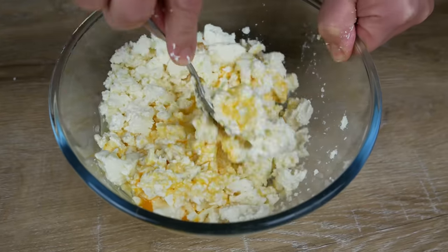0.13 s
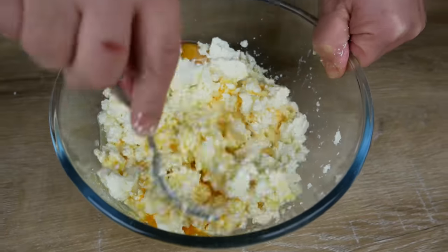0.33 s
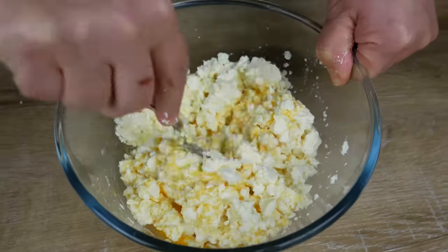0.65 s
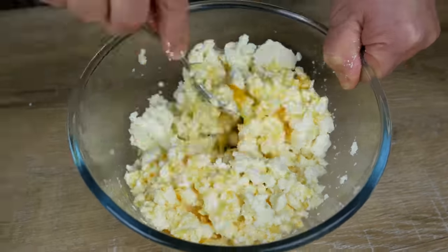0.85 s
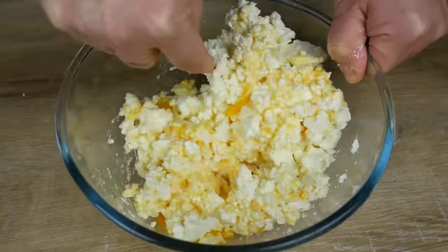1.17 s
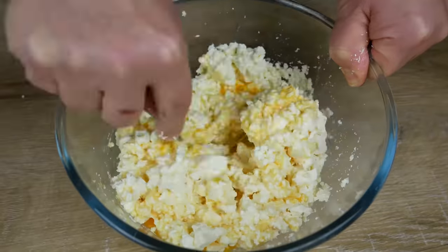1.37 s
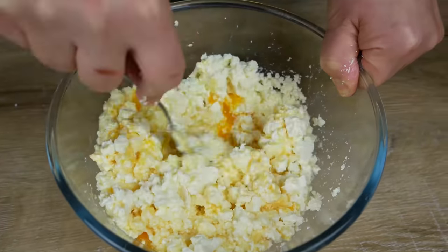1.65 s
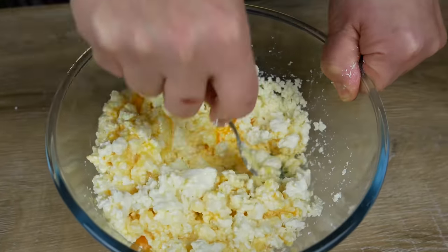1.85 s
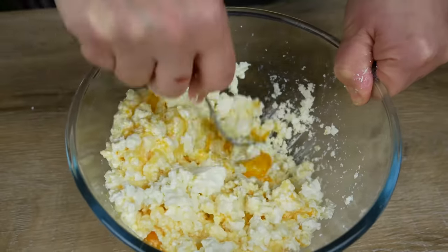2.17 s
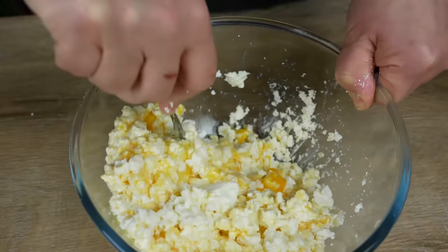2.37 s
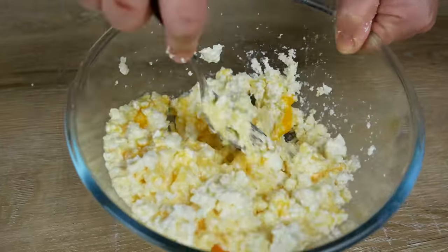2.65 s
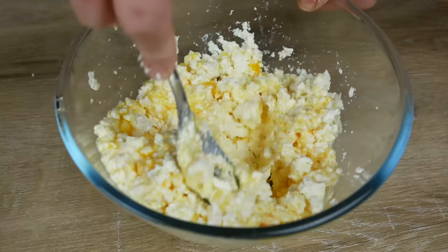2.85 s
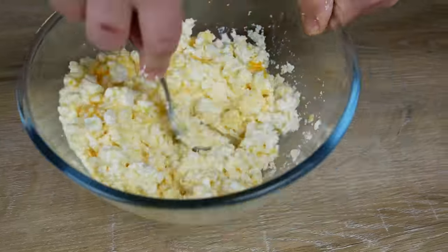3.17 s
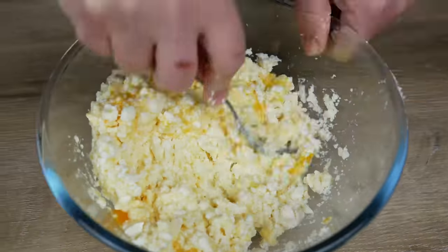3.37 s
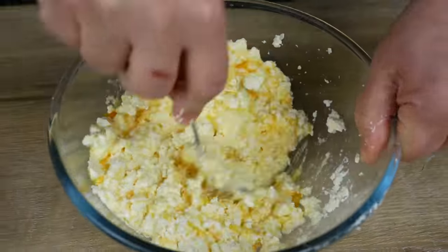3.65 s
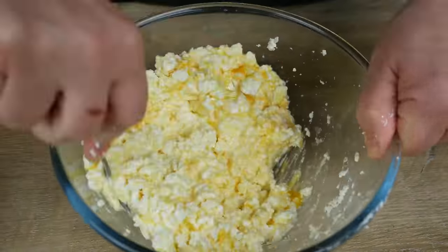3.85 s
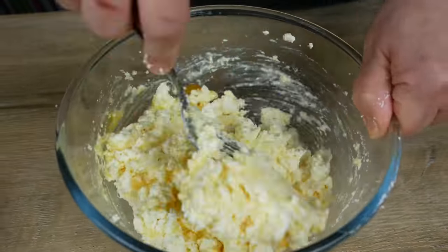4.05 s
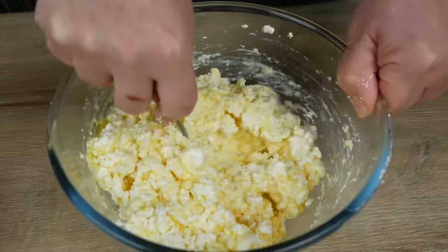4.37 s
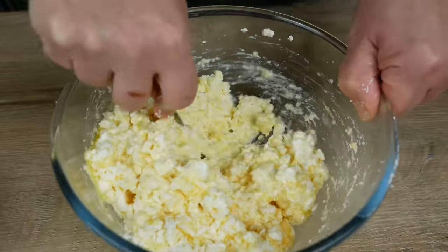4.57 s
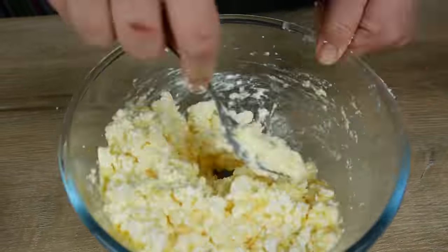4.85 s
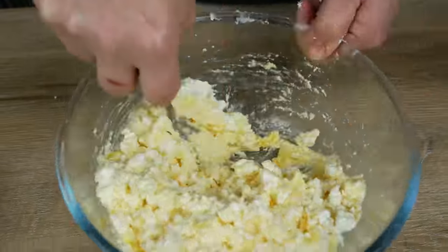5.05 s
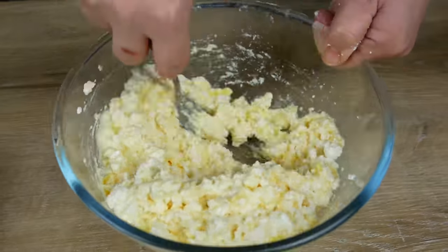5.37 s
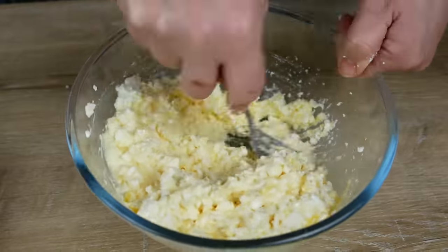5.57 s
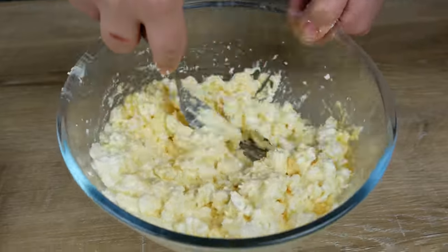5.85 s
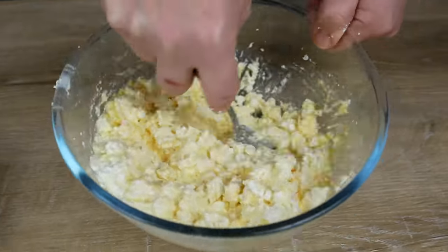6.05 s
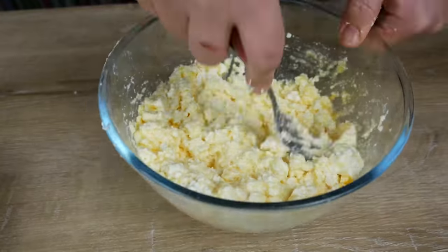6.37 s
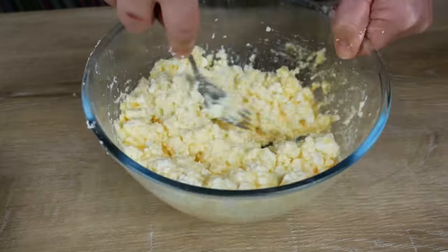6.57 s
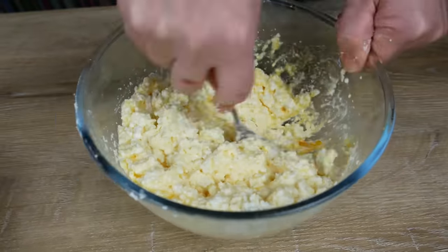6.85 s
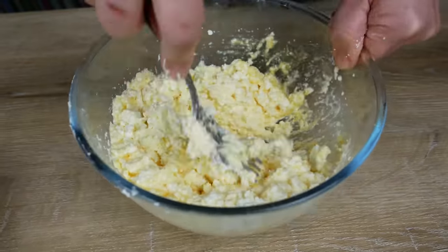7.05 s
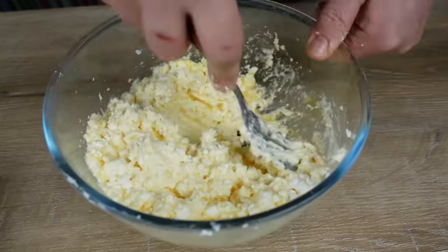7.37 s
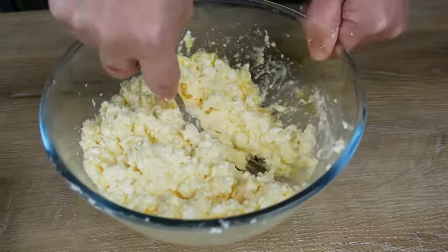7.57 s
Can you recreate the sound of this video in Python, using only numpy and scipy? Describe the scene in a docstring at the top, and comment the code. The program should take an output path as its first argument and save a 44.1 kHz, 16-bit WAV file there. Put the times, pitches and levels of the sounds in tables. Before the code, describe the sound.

A metal fork rapidly beats wet crumbled cheese and egg in a glass bowl, clicking and squelching as the bowl knocks on wood.

```python
"""Fork beating cheese and egg

A metal fork beats crumbled cheese and egg in a glass bowl, about twelve strokes a second. Each stroke
is a short chatter of tines on glass, a wet drag through the mix and a knock of the bowl on a wooden
board, all made of gritty contact noise played through resonances. Sticky crackle, a few rim clinks,
low kitchen rumble and room tone fill the gaps. The image starts centred, then opens wide."""
import sys
import numpy as np
from scipy import signal
from scipy.fft import rfft, irfft, next_fast_len
from scipy.io import wavfile

SR = 44100
rng = np.random.default_rng(int(sys.argv[2]) if len(sys.argv) > 2 else 0)


def wav_record(signal):
    """Record a signal, one row per channel, as 16-bit PCM in the file named by sys.argv[1]."""
    frames = np.transpose(np.atleast_2d(signal))
    bounded = np.clip(frames, -1, 1)
    # unit amplitude maps onto the largest positive 16-bit level
    quanta = np.round(bounded * 32767).astype(np.int16)
    wavfile.write(sys.argv[1], SR, quanta)


N = 340011

# Bowl and fork, damped by the mix. Each row: pitch in Hz, bandwidth in Hz, level in dB.
BOWL_MODES = [(663, 250, -5), (770, 144, 0.5), (1072, 97, -8), (1277, 110, -5), (1476, 470, -3),
              (2024, 56, -5), (2490, 510, -5.5), (2875, 415, -2), (3310, 540, -8.5), (3494, 740, -8.5),
              (3754, 240, -5), (4185, 147, -2), (4530, 210, -1), (4380, 360, -6), (5030, 450, -3.5),
              (6080, 500, -4), (6630, 4500, -16), (7960, 880, 2.5), (8680, 350, 2.5), (9080, 320, 1),
              (9620, 310, 0.5), (11140, 4200, -23), (12300, 390, 4), (12300, 1350, -5), (13770, 3900, -1),
              (15600, 810, -27)]
# The board under the bowl. Each row: pitch in Hz, bandwidth in Hz, level in dB.
BOARD_MODES = [(87, 82, -20), (140.4, 26.5, 4), (185, 120, -5), (266, 100, -2.5), (314, 81, 1.5),
               (389.5, 49, 1.5), (594, 157, -4.5)]
# The stereo image. Each row: time in seconds, width from 0 (centred) to 1.
STEREO_WIDTH = [(0, 0), (.36, 0.1), (.39, 0.68), (.7, 1), (7.71, 0.94)]
# Colour of the room tone. Each row: frequency in Hz, relative level in dB.
ROOM_SPECTRUM = [(20, -20), (45, -36), (110, -26.5), (340, -28), (700, -38), (3300, -39.5), (7000, -43),
                 (11000, -57), (16000, -59)]
# Fade of a faint tone in the room. Each row: time in seconds, rms level in dB.
TONE_FADE = [(0, -60), (1.5, -61), (2.2, -86), (3.0, -88)]
# Low kitchen rumble. Each row: time in seconds, rms level in dB.
RUMBLE_LEVEL = [(0,-49),(.79,-63),(1.1,-72),(1.719,-75),(2.98,-65),(3.6,-58),(4,-71),(4.87,-69),(6.1,-73),(6.72,-60),(7.71,-59)]
# Crackle of the mix. Each row: time in seconds, rms level in dB.
CRACKLE_LEVEL = [(0,-50),(.3,-53),(.6,-51.5),(1.4,-43.5),(2.2,-55),(3,-46),(3.7,-55.5),(4.1,-58),(4.4,-61),(5.2,-47.5),(6,-51.5),(6.8,-64),(7.2,-42.5),(7.71,-71)]
# The beating. Each row: start in seconds, contact in ms, chatter level in dB, featured ring in Hz,
# bass and treble in dB against the chatter, drag length in ms, drag level in dB, board knock in dB.
FORK_STROKES = [(.091,11.5,-24.5,2270,-6,-18,79,-36.5,-26.5),(.379,20.4,-25,2200,-3,-6,57,-47,-33.5),(0.623,17,-42,815,4,-8,56,-48,-40),(0.706,43,-43.5,6060,-0.5,-1,86.4,-50.5,-62),
                (0.809,14,-30.5,5660,0.5,3,85.32,-51.5,-36.5),(0.913,27,-28.5,4760,0,-2,54.5,-43.5,-25.5),(1.014,37,-37.5,1390,-4,-6,93.96,-47.5,-59),(1.114,14.5,-27.5,910,3,-8,49.6,-38.5,-25.5),
                (1.216,8.4,-43,2130,-19,2,96,-46,-62),(1.351,37,-39.5,1180,0,-17,106,-49.5,-60),(1.458,21,-32.5,2400,2,-8,54.7,-37.5,-37),(1.552,11.5,-27,804,-0.5,-6,47,-37,-30),
                (1.625,18,-42.5,5790,-5,5.5,75.6,-45.5,-54),(1.711,15,-20,2570,-14,-1,57,-40,-27.5),(1.8,12,-25,860,-1.5,-2.5,54,-40,-26.5),(1.884,12,-23,2650,-9.5,-4,47.4,-42.5,-28),
                (1.966,10,-28.5,4480,-15,-1,48.4,-43.5,-30),(2.041,10.3,-30,824,14.5,6,55,-46,-36),(2.119,22,-28.5,774,5,4,68.04,-62,-37),(2.205,15,-23.5,4450,-8,-0.5,31,-48,-32),
                (2.283,13.5,-22.5,2750,-4.5,0,51,-43.5,-36),(2.36,16.4,-27,2560,-13,0,31.48,-43,-35.5),(2.437,15,-26.5,5100,-1,1,118,-48,-34.5),(2.605,37.5,-26.5,2670,-2,-1.5,97.2,-54,-25),
                (2.71,26,-27,3350,-3,-3.5,48,-37,-28.5),(2.808,36,-26.5,4120,-5,-6,62.04,-43,-33),(2.892,62,-36,820,-1,-1,72.36,-49.5,-55),(2.984,21,-29,4200,-7.5,-1,57,-39,-37),
                (3.064,10.4,-18.5,4450,-3.5,-3,73,-40.5,-37),(3.157,13,-27.5,2120,3,2,62,-42,-30.5),(3.234,14.6,-27.5,714,3,-2,38,-38.5,-39),(3.308,12.4,-23,2190,-5,4.5,55.6,-38.5,-40),
                (3.389,8.2,-23.5,1310,4,-1.5,47,-38,-42),(3.483,16,-30.5,2640,-20,-2.5,55.5,-40,-34.5),(3.555,10,-20.5,2070,-1,-3,54.6,-37,-47),(3.635,8.3,-23.5,1330,0.5,5.5,57.5,-38.5,-41.5),
                (3.712,11.2,-18.5,6070,-9,-1.5,55,-37.5,-36),(3.789,7.1,-18.5,673,4,-4.5,43.6,-38,-32),(3.872,9.2,-29,2770,-17,10,40,-49,-38.5),(3.914,11,-22.5,4400,-35,-5.5,32.4,-43,-43),
                (4.202,16,-29,1410,-4.5,0,54,-42.5,-26),(4.377,16,-28,1640,-5,1.5,46.44,-41.5,-26),(4.461,15,-22.5,4800,-2.5,-1.5,44,-44,-34),(4.534,24,-36.5,2980,1.5,0.5,60,-49,-43),
                (4.598,10.6,-21.5,810,1,-11,26.85,-32.5,-34),(4.662,10.6,-23,1290,5.5,-1,50,-38,-38.5),(4.731,15,-30,1126,10.5,3,39,-38.5,-36.5),(4.813,14,-26,2720,-4,3,48.6,-39,-28.5),
                (4.887,10.4,-25,4200,-9,1,70,-38.5,-26.5),(4.994,16,-23,4350,-3.5,0,60,-38,-27),(5.07,16.5,-23,4760,-7,1,31,-40,-29.5),(5.142,7.1,-24.5,3930,-5.5,4.5,38,-37,-32),
                (5.205,8.4,-20,4260,-19,4,53,-40,-30),(5.277,10,-22,3550,-6,0,56,-33.5,-27),(5.367,22,-27.5,3900,-14,-1,52.3,-35.5,-29),(5.454,20,-29.5,4200,-11.5,-1.5,47,-36,-34),
                (5.528,16.5,-22.5,4740,-8.5,-8,49,-52,-27.5),(5.593,8.9,-21,880,5,4.5,49,-38.5,-35),(5.671,9,-26,1530,1,1.5,54,-38.5,-35),(5.76,20,-23.5,4750,-14,-2.5,47.52,-39,-26),
                (5.846,16,-23,730,-11,-3.5,42.4,-37.5,-32.5),(5.921,13.6,-21.5,4900,-4,-3.5,53,-42,-26.5),(5.998,11,-25.5,2780,-10,-3,36.5,-41.5,-37),(6.073,11,-26,4700,4.5,4.5,49.6,-37.5,-30.5),
                (6.156,24,-24.5,2860,-12,-7,57.24,-40.5,-28),(6.242,10,-24,5130,-12,2,30,-41,-25.5),(6.323,11,-27,4360,-17,7.5,62.96,-46,-25),(6.405,42,-34.5,3570,-17,-1,69.12,-47.5,-40),
                (6.49,12,-22,5100,-29,0,55.4,-52,-30.5),(6.567,15,-29,3020,-10,9,50,-43,-33),(6.639,13.7,-21.5,3200,-38,3,55,-44,-27.5),(6.709,10.7,-14.5,4600,-14.5,-6.5,60,-39,-35),
                (6.803,12,-23.5,5000,-36,-2.5,29.63,-44,-27.5),(6.882,19,-31.5,4270,-4,2,58,-50,-31),(6.948,11.6,-18,1680,-8.5,-7,62,-40.5,-33.5),(7.024,9,-24,676,6.5,5,38,-39.5,-29),
                (7.097,10,-24.5,4650,0,4.5,50,-41.5,-29),(7.184,16.5,-25.5,4340,-14,-2.5,52.5,-42.5,-33),(7.263,12,-29,4230,-21,0,45,-38.5,-33.5),(7.334,10.4,-27,1210,10,6.5,43.7,-40,-33),
                (7.409,13,-20,4540,-3.5,-2.5,39.96,-43,-33),(7.489,11,-18,4330,-9.5,-4,56.5,-36.5,-42),(7.568,13,-26,1660,-6.5,3,54.6,-38.5,-39),(7.642,8.4,-16,2590,-5.5,-6.5,60.4,-39.5,-34.5)]
# Extra wet squelches, short and long, some leading into a stroke. Each row: start in seconds,
# length in ms, level in dB.
EXTRA_SQUELCHES = [(.006,63,-49.5),(.064,21,-36),(0.174,80,-49.5),(.348,25,-57),(.447,150,-48.5),(1.695,13,-42),(3.939,304,-42),(4.275,69,-39)]
# Colour of the drag. Each row: time in seconds, bass and treble in dB against the drag level.
DRAG_EQ = [(0,-9,-2),(1.3,-10.5,-6),(2.2,-12,-5),(3.5,-6.5,-2),(4.5,-7,-3),(5.5,-10.5,-1.5),(6.5,-3.5,2),(7.71,-8,-2)]
# Sticky ticks as the fork first enters. Each row: start in seconds, peak in dB, pitch in Hz.
ENTRY_TICKS = [(.01,-17,7470),(.0324,-21,8710),(0.0407,-17.5,8710),(.0654,-21,7860),(0.0764,-4,3540),(.0927,-21,2360),(0.1034,-12,2600),
               (.1226,-29,2750),(0.145,-16,4220),(0.179,-15,7600),(0.187,-27,1720),(.194,-11.5,3830),(0.202,-29,1730),(.2064,-21,4850),(.2124,-27,3400),(0.26,-31,8510),(0.3876,-6.5,3820)]
# The bowl rocks and drops back. Each row: start in seconds, contact in ms, knock in dB, deep note in dB.
BOWL_ROCKS = [(0.076,5.9,-22.5,-24),(0.128,18,-32.5,-37),(0.159,14,-39,-46),(1.234,5.6,-32,-44),(3.504,12,-34.5,-31),(3.731,9.2,-18.5,-20),(4.238,7.4,-16.5,-24.5),
              (4.402,6.7,-18,-26.5),(5.079,14,-35,-32),(5.299,9.2,-27.5,-23),(5.798,8.6,-33,-29),(5.961,11,-15.5,-16.5),(6.101,10,-16.5,-18),(6.202,15,-16,-17.5),(6.391,5.2,-17.5,-20.5),
              (6.583,6.9,-17.5,-19),(6.751,11.6,-19,-17),(6.771,9.8,-19,-25),(6.893,10.4,-27,-26.5),(7.273,9.2,-25,-29),(7.51,8.4,-14.5,-20)]
# The board's deep note. Each row: time in seconds, level in dB against a stroke's knock.
DEEP_NOTE = [(0,-1),(1,-3.5),(2,-2.5),(3,-1),(3.8,-3),(4.7,-0.5),(5.5,-0.5),(6.2,0),(7,0),(7.71,-10)]
# A faint sub-bass push. Each row: time in seconds, level in dB against the deep note.
SUB_PUSH = [(0,-9),(3.5,-14),(4.3,-15),(5.1,-12),(5.9,-16),(6.7,-14),(7.71,-16)]
# Tines brush the glass between strokes. Each row: start in seconds, contact in ms, chatter level in dB,
# featured ring in Hz.
GLASS_BRUSHES = [(0.115,33,-28.5,2800),(.536,48,-44.5,970),(0.655,13,-49,830),(1.236,38,-39,2200),(1.388,25,-36,5530),(1.668,13,-31,3940),
                 (1.736,23,-39,4540),(1.823,28,-38,4760),(2.072,24,-36.5,5930),(2.145,37,-41,5030),(2.239,16,-36.5,4600),(2.393,17,-41,2930),(2.467,31,-39,830),
                 (3.014,16,-35.5,1160),(3.103,24,-51,4470),(3.194,17,-36,4380),(3.274,22,-34.5,5440),(3.753,10,-46,800),(3.961,45,-33.5,1300),(4.011,65,-30.5,3240),
                 (4.136,11,-39,5800),(4.323,25,-41,1490),(4.417,14.5,-35,1670),(4.489,27,-33.5,3550),(4.567,9.1,-29,2870),(4.631,14,-34,5280),
                 (4.776,18.5,-32,5400),(4.849,17,-29,4760),(5.033,13,-44,5850),(5.102,21,-29,4750),(5.549,20,-26.5,4970),(6.27,18,-35,5900),
                 (6.35,27,-38.5,5070),(6.515,23,-37,5760),(6.827,20,-41,5800),(6.984,19,-32.5,5460),(7.045,13,-31,4600),(7.066,12.5,-31.5,3830),
                 (7.21,12,-35.5,4800),(7.373,11,-34.5,5900),(7.442,23,-36,5860)]
# The chatter's body thins as curds turn to paste. Each row: time in seconds, base level in dB against
# the chatter.
CHATTER_BODY = [(0,-1.5),(.8,0),(1.4,-3.5),(2,-5),(2.7,-4.5),(3.5,-6),(4.3,-5.5),(5,-4),(5.8,-7),(6.5,-5.5),(7,-7.5),(7.71,-1)]
# Band edges in Hz for the drag: bass, mids, treble, top.
DRAG_BANDS_HZ = (500, 1200, 6500, 10500, 16000)
# Band edges in Hz for the board: push, deep note, knock.
BOARD_BANDS_HZ = (20, 90, 220, 520)
# Band edges in Hz for the tines: bass, body, chatter, treble, top.
TINE_BANDS_HZ = (500, 1200, 2700, 6500, 10500, 16000)
# Clean hits on the bare rim. Each row: start in seconds, peak in dB.
RIM_CLINKS = [(.379, -45), (3.555, -38), (6.073, -22), (7.643, -21.5)]

PRE_ROLL_MS = 12   # room for the attack ahead of each contact


def from_db(db):
    """Decibels to gain."""
    return 10 ** (np.asarray(db) / 20)


def curve_at(s, curve):
    """Read an automation curve at a time in seconds."""
    return np.interp(s, *np.transpose(curve))


def width_at(s):
    """Stereo width at a time in seconds."""
    return curve_at(s, STEREO_WIDTH)


def grit(uneven_db, lump_db, lump_ms):
    """Shared, left and right trains of micro-contacts; the force wavers as curds catch and let go."""
    size = N + SR
    noise = rng.standard_normal((3, size))
    trains = noise * from_db(uneven_db * np.minimum(rng.exponential(1, (3, size)), 6))
    waver = np.interp(np.arange(size) * 1000 / SR / lump_ms, np.arange(9000), rng.standard_normal(9000))
    return trains / trains.std() * from_db(lump_db * waver)


def contact_envelope(ms, rise_ms, fall_ms, sag_db, tail_ms):
    """A rounded attack, a hold that sags and an exponential release, with room left for the ring."""
    size = next_fast_len(int((PRE_ROLL_MS + ms + tail_ms) * SR / 2000)) * 2
    t_ms = np.arange(size) * 1000 / SR - PRE_ROLL_MS
    rise = np.exp(-.5 * (np.minimum(t_ms - rise_ms, 0) / rise_ms) ** 2)
    hold = from_db(-sag_db * np.clip(t_ms / ms, 0, 1))
    return rise * hold * np.exp(-np.maximum(t_ms - ms, 0) / fall_ms)


def resonator(modes, width, size, spread_db, low_hz, high_hz):
    """Stereo response of an object: each mode gets a fresh strength; width pulls its phases apart."""
    hz = np.arange(size // 2 + 1) * SR / size
    centre, bandwidth, level = np.transpose(modes)[:, :, None]
    strength = from_db(level + spread_db * rng.standard_normal((len(modes), 1)))
    left, turn = rng.random((2, len(modes)))
    phase = np.exp(2j * np.pi * np.array([left, left + width * (turn - .5)]))
    low_cut = (1j * hz / (low_hz + 1j * hz)) ** 2   # small bodies radiate no deep bass
    high_cut = 1 / (1 + 1j * hz / high_hz) ** 2
    return low_cut * high_cut * (phase @ (strength / (1 + 2j * (hz - centre) / bandwidth)))


def add_contact(out, s, envelope, trains, response, bands_hz, bands_db, apart):
    """Mix in a burst of resonating grit, levelled by band; `apart` is the unshared part at full width."""
    start = round((s - PRE_ROLL_MS / 1000) * SR)
    skip = max(-start, 0)
    size = len(envelope)
    common, *own = trains[:, start + skip:start + skip + size]
    own_share = apart * width_at(s)
    force = np.sqrt(1 - own_share) * common + np.sqrt(own_share) * np.array(own)
    spectrum = rfft(envelope * force) * response
    hz = np.arange(spectrum.shape[1]) * SR / size
    power = np.mean(abs(spectrum) ** 2, axis=0) / np.sum(envelope ** 2)
    eq_hz, eq_db = [], []
    for low, high, db in zip(bands_hz, bands_hz[1:], bands_db):
        band_power = power[(hz >= low) & (hz < high)].sum() / len(hz)
        eq_hz += [low * 1.1, high / 1.1]
        eq_db += [db - 10 * np.log10(band_power)] * 2
    eq = from_db(np.interp(np.log(hz + 1), np.log(eq_hz), eq_db))
    out[:, start + skip:start + size] += irfft(spectrum * eq, size)[:, skip:N - start]


def room_tone(air_db=-56.5, tone_hz=583):
    """A steady, bass-heavy bed of kitchen air, with a faint tone that fades as the beating speeds up."""
    hz = np.arange(N // 2 + 1) * SR / N + 1
    t = np.arange(N) / SR
    eq_hz, eq_db = np.transpose(ROOM_SPECTRUM)
    colour = from_db(np.interp(np.log(hz), np.log(eq_hz), eq_db))
    mid, side = irfft(rfft(rng.standard_normal((2, N))) * colour, N)
    air = (mid + 1.03 * width_at(t) * side * [[1], [-1]]) / mid.std()
    tone = np.sqrt(2) * from_db(curve_at(t, TONE_FADE)) * np.sin(2 * np.pi * tone_hz * t)
    return from_db(air_db) * air + tone


def kitchen_rumble():
    """Low kitchen rumble, loudest at the start, swelling and fading, mostly in the centre."""
    t = np.arange(N) / SR
    sub_band = signal.butter(2, [15, 55], "band", fs=SR, output="sos")
    mid, side = signal.sosfilt(sub_band, rng.standard_normal((2, N)))
    rumble = (mid + 0.56 * width_at(t) * side * [[1], [-1]]) / mid.std()
    return from_db(curve_at(t, RUMBLE_LEVEL)) * rumble


def sticky_crackle():
    """Films of egg keep parting: fine crackle coloured by the bowl."""
    t = np.arange(N) / SR
    common, *own = grit(uneven_db=4.0, lump_db=7.5, lump_ms=9.0)[:, :N]
    force = np.sqrt(1 - width_at(t)) * common + np.sqrt(width_at(t)) * np.array(own)
    bowl = abs(resonator(BOWL_MODES, width=0, size=2048, spread_db=0.94, low_hz=350, high_hz=21000)[0])
    colour = np.interp(np.linspace(0, 1, N // 2 + 1), np.linspace(0, 1, len(bowl)), bowl)
    crackle = irfft(rfft(force) * colour, N)
    return from_db(curve_at(t, CRACKLE_LEVEL)) * crackle / crackle.std()


def wet_drag(lead_share=0.38, top_drop_db=6.0):
    """Curds and egg squelch past the tines; two wavering layers make the colour wander."""
    out = np.zeros((2, N))
    times, *eq_curves = np.transpose(DRAG_EQ)
    # The fork enters the mix a share of the contact time before it meets glass.
    drags = [(s - lead_share * touch_ms / 1000, ms, db) for s, touch_ms, *_, ms, db, _ in FORK_STROKES]
    for layer in range(2):
        trains = grit(uneven_db=2.0, lump_db=3.0, lump_ms=3.6)
        for s, ms, db in drags + EXTRA_SQUELCHES:
            bass_db, treble_db = [np.interp(s, times, curve) for curve in eq_curves]
            bands_db = db + np.array([bass_db, 0, treble_db, treble_db - top_drop_db])
            envelope = contact_envelope(ms, rise_ms=2.9 + 0.018 * ms, fall_ms=2.3 + 0.021 * ms,
                                        sag_db=4, tail_ms=52)
            bowl = resonator(BOWL_MODES, width_at(s), len(envelope),
                             spread_db=1.5, low_hz=180, high_hz=29000)
            add_contact(out, s, envelope, trains, bowl, DRAG_BANDS_HZ, bands_db, apart=.3)
    return out


def sticky_ticks(snap_s=0.00047, ring_cycles=2.0):
    """The mix ticks as the fork first enters: each a broad snap with a ring of a few cycles."""
    out = np.zeros(N)
    t = np.arange(SR // 100) / SR
    for s, db, hz in ENTRY_TICKS:
        snap = 0.51 * rng.standard_normal(len(t)) * np.exp(-t / snap_s)
        ring = np.sin(2 * np.pi * hz * t) * np.exp(-t * hz / ring_cycles)
        tick = snap + ring
        out[round(s * SR):][:len(t)] += from_db(db) * tick / abs(tick).max()
    return out


def board_knocks(knock_ms=9.9):
    """The bowl bumps the board: a soft contact wakes only the low modes, over a faint push."""
    out = np.zeros((2, N))
    trains = grit(uneven_db=2.5, lump_db=1.0, lump_ms=6.7)
    knocks = [(s, knock_ms, db, db + curve_at(s, DEEP_NOTE)) for s, *_, db in FORK_STROKES]
    for s, ms, db, deep_db in knocks + BOWL_ROCKS:
        push_db = deep_db + curve_at(s, SUB_PUSH)
        envelope = contact_envelope(ms, rise_ms=3.2, fall_ms=8.9, sag_db=5.5, tail_ms=58)
        board = resonator(BOARD_MODES, width_at(s), len(envelope),
                          spread_db=2.03, low_hz=8.5, high_hz=666)
        add_contact(out, s, envelope, trains, board, BOARD_BANDS_HZ, [push_db, deep_db, db], apart=.15)
    return out


def tine_chatter(hold_share=0.59, top_drop_db=3.5, body_hz=1670, body_octaves=0.87):
    """Tines rattle on glass: where they land picks the ring; longer contacts build more slowly."""
    out = np.zeros((2, N))
    trains = grit(uneven_db=2.5, lump_db=1.5, lump_ms=5.0)
    brushes = []
    for s, ms, db, hz in GLASS_BRUSHES:
        bass_db = 1.5 - 5.5 * np.log2(hz / 1000)   # lower rings sound hollower
        treble_db = 0.35 * (-39 - db)   # fainter brushes sound brighter
        brushes.append((s, ms, db, hz, bass_db, treble_db))
    for s, ms, db, hz, bass_db, treble_db, *_ in FORK_STROKES + brushes:
        lift_db = 9 * np.exp(-(np.log2(hz / body_hz) / body_octaves) ** 2)   # nearby rings add body
        body_db = curve_at(s, CHATTER_BODY) + 0.21 * bass_db + lift_db
        bands_db = db + np.array([bass_db, body_db, 0, treble_db, treble_db - top_drop_db])
        envelope = contact_envelope(ms * hold_share, rise_ms=0.93 + 0.14 * ms, fall_ms=2.72 + 0.12 * ms,
                                    sag_db=4.0, tail_ms=20)
        featured_ring = (hz, 90 + 0.046 * hz, 9 - 1.4 * np.log2(hz / 1000))
        bowl = resonator(BOWL_MODES + [featured_ring], width_at(s), len(envelope),
                         spread_db=3.8, low_hz=215, high_hz=24000)
        add_contact(out, s, envelope, trains, bowl, TINE_BANDS_HZ, bands_db, apart=.2)
    return out


def rim_clinks(rim_hz=2077, t60_s=0.084):
    """A clean hit leaves one glass mode ringing, with its own phase on each side."""
    out = np.zeros((2, N))
    for (s, db), turn in zip(RIM_CLINKS, rng.random(len(RIM_CLINKS))):
        start = round(s * SR)
        t = np.arange(N - start) / SR
        phase = 2 * np.pi * (rim_hz * t + turn * width_at(s) * np.array([[0], [1]]))
        out[:, start:] += from_db(db - 60 * t / t60_s) * np.sin(phase)
    return out


def scene():
    """The three layers of the strokes, then the small details and the low bed."""
    strokes = tine_chatter() + wet_drag() + board_knocks()
    return strokes + sticky_ticks() + sticky_crackle() + rim_clinks() + kitchen_rumble() + room_tone()


def record(dry):
    """A steep high cut on the whole mix, 70 dB down at 16.3 kHz."""
    return signal.sosfilt(signal.cheby2(12, 70, 16300, fs=SR, output="sos"), dry)


dry = scene()
out = record(dry)
wav_record(out)
```